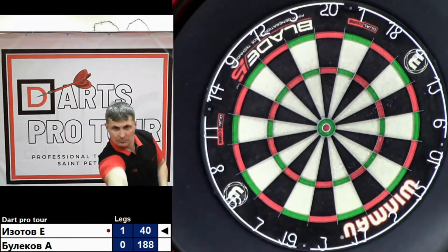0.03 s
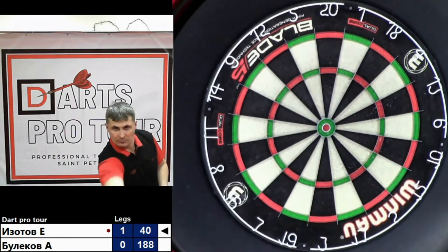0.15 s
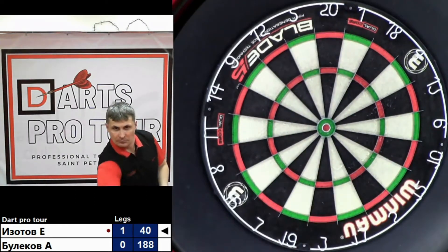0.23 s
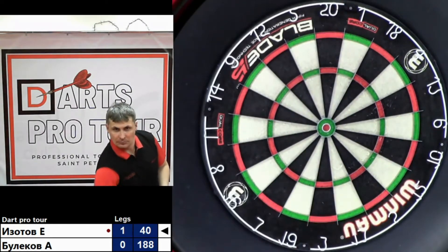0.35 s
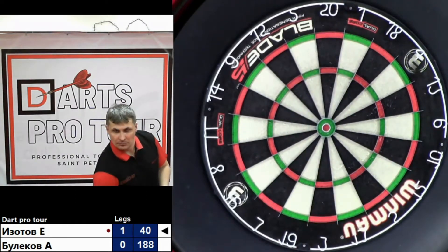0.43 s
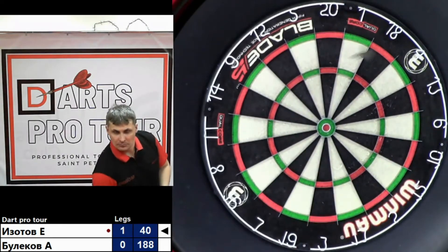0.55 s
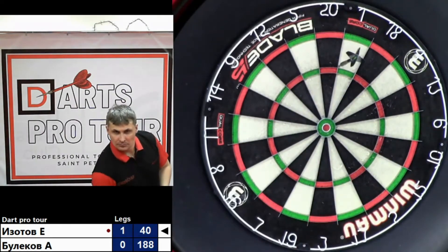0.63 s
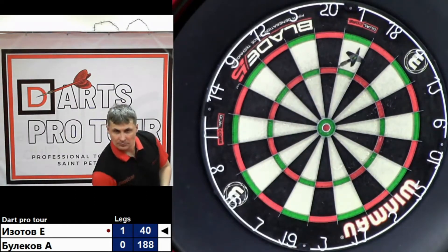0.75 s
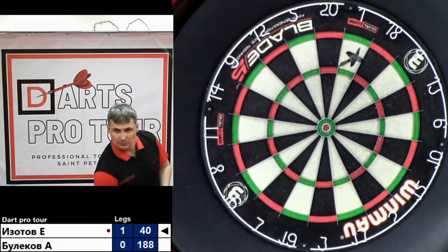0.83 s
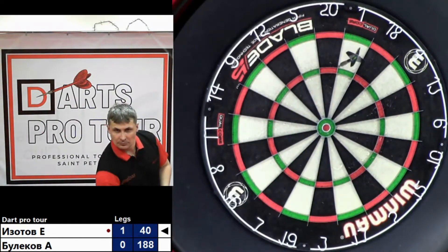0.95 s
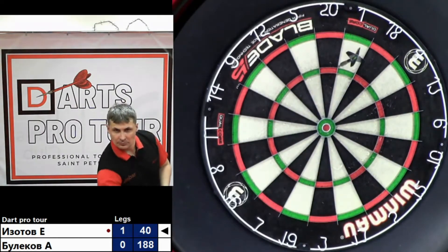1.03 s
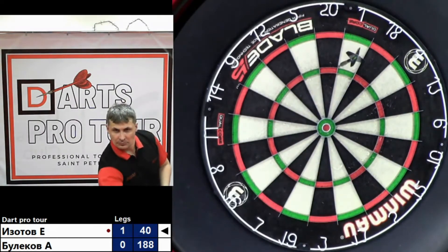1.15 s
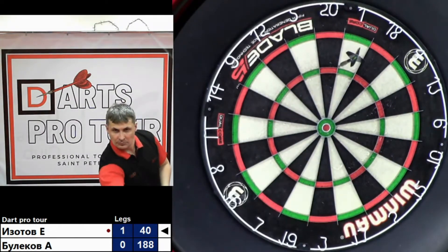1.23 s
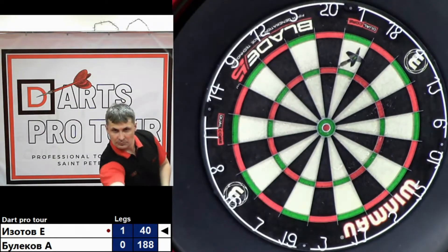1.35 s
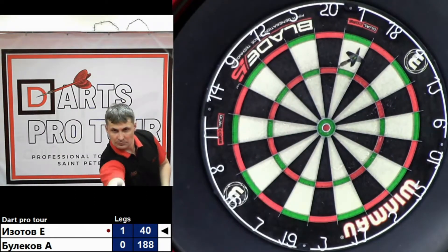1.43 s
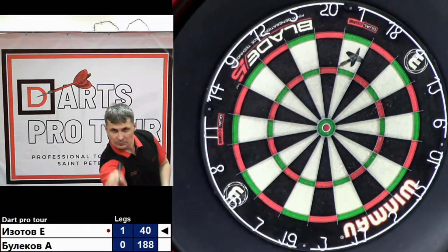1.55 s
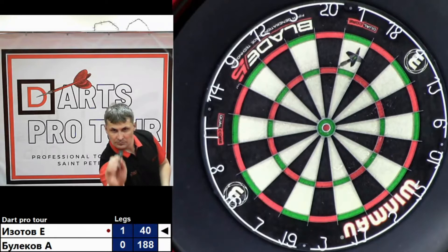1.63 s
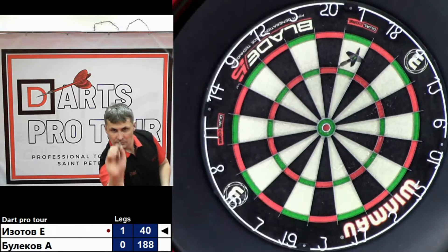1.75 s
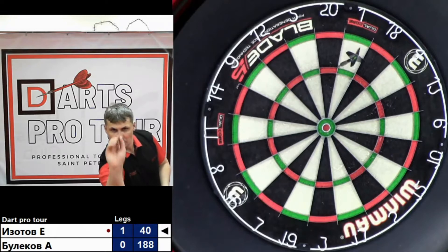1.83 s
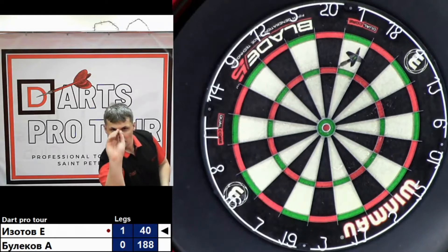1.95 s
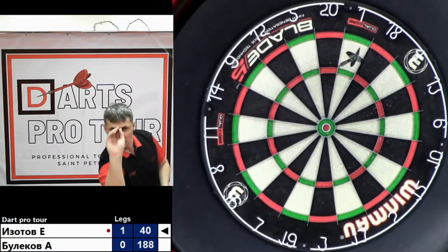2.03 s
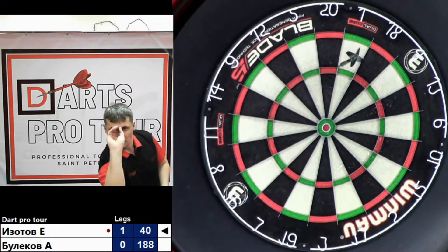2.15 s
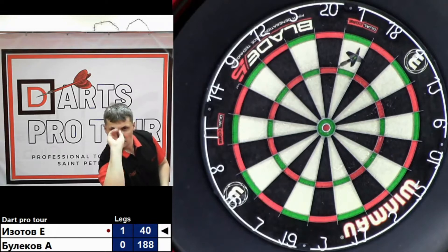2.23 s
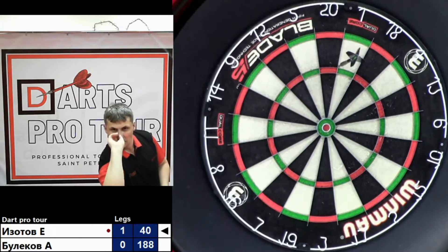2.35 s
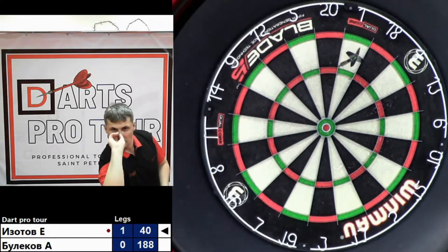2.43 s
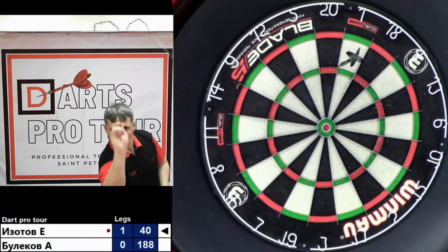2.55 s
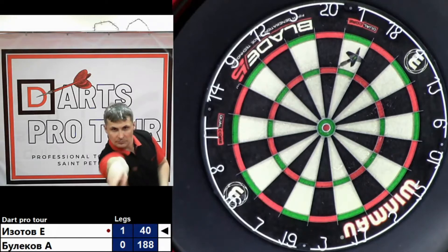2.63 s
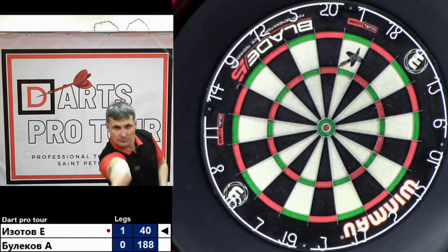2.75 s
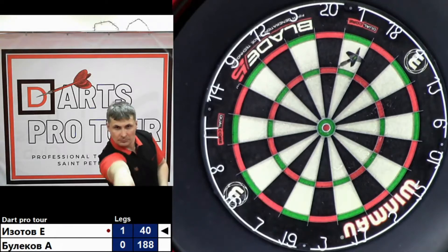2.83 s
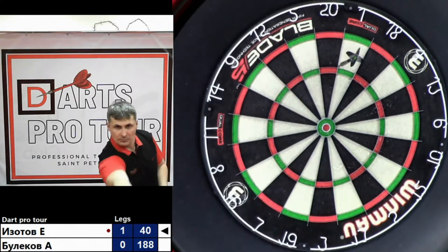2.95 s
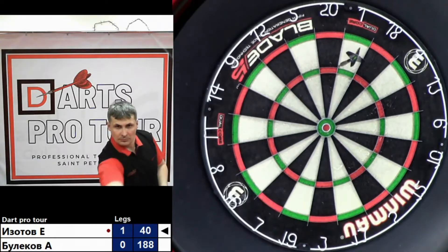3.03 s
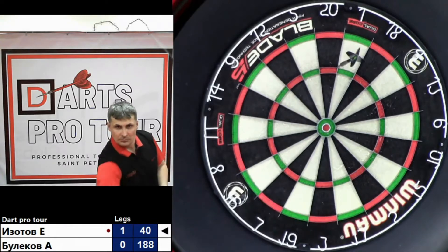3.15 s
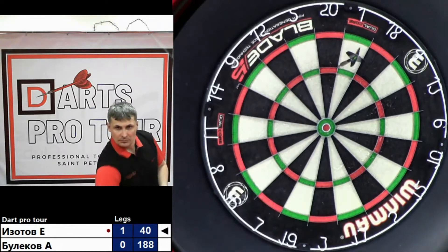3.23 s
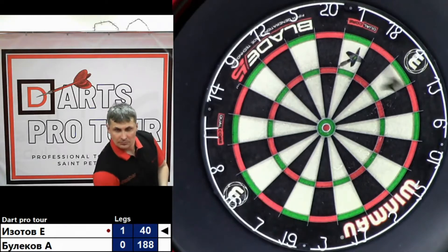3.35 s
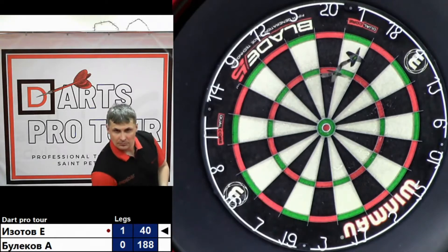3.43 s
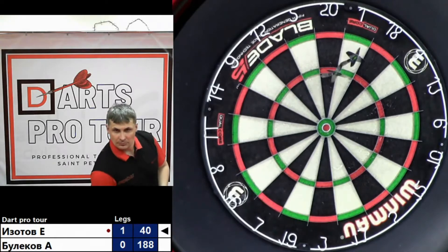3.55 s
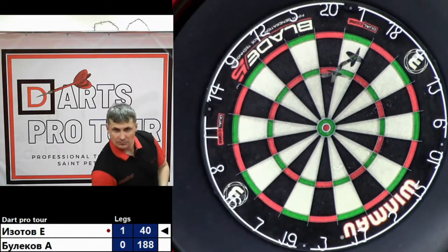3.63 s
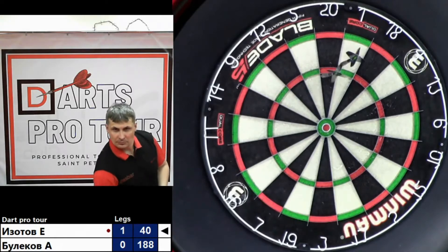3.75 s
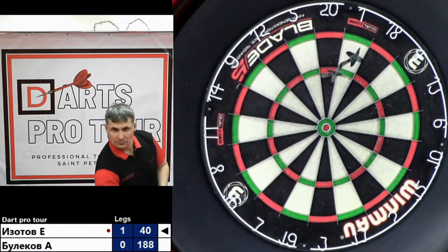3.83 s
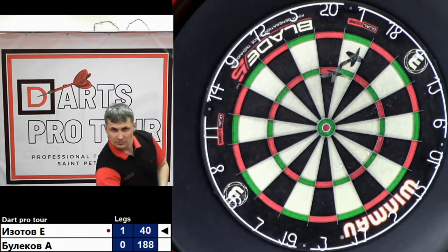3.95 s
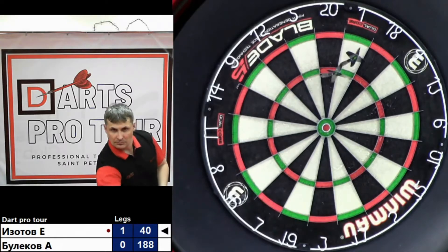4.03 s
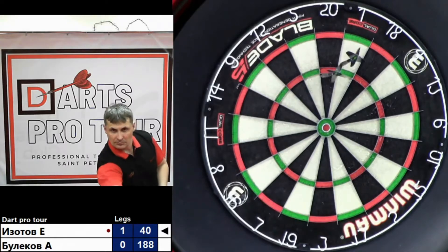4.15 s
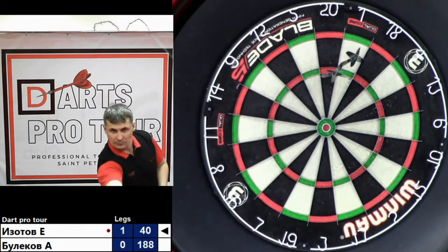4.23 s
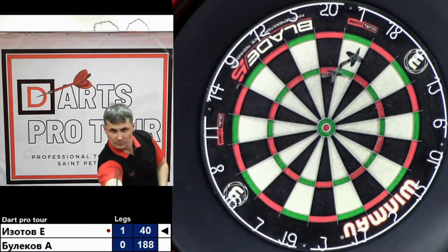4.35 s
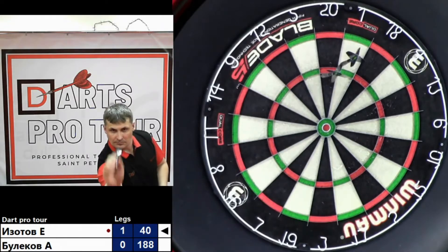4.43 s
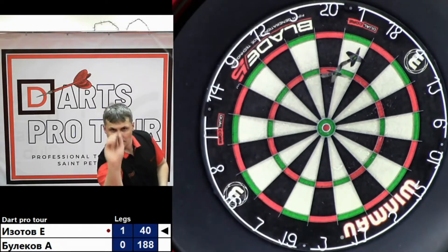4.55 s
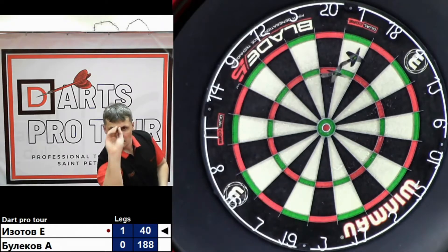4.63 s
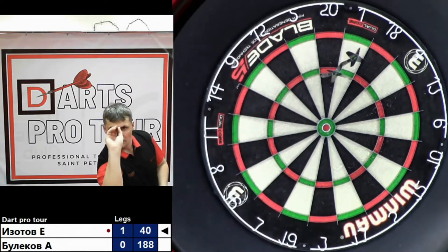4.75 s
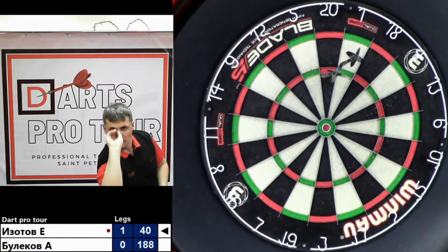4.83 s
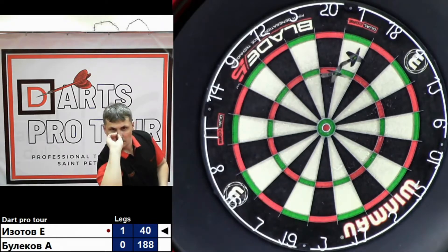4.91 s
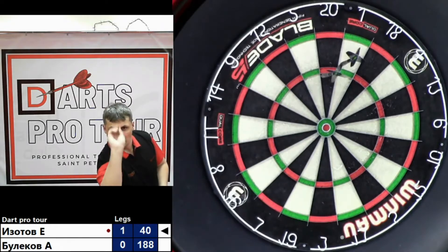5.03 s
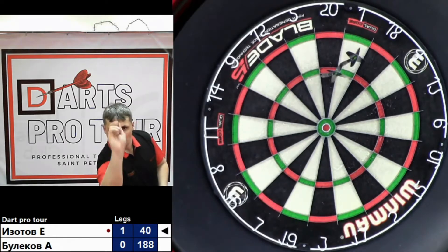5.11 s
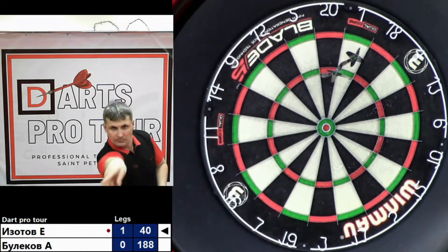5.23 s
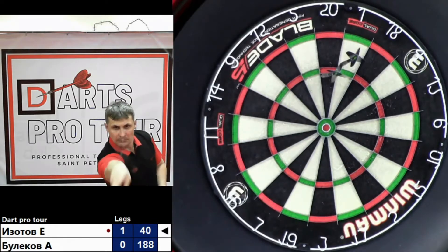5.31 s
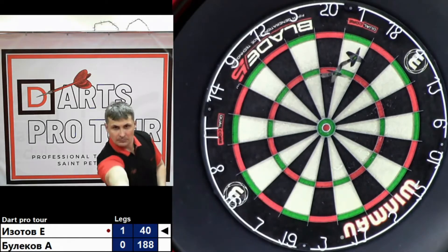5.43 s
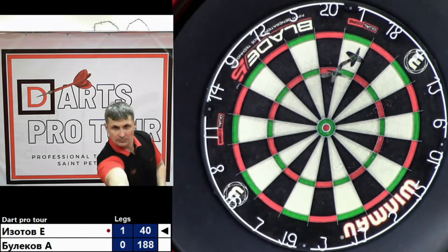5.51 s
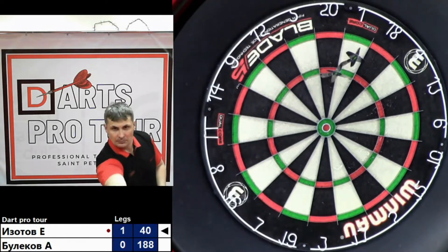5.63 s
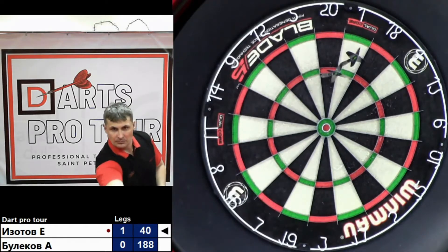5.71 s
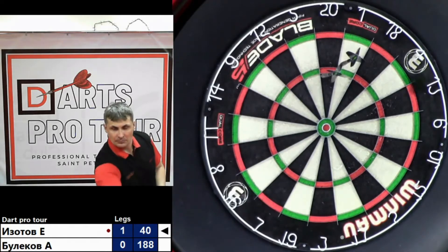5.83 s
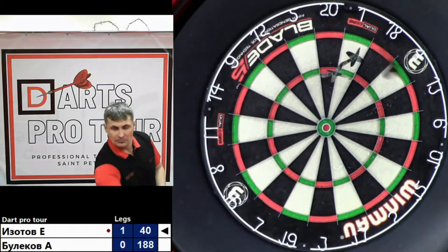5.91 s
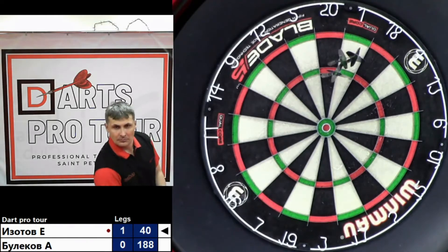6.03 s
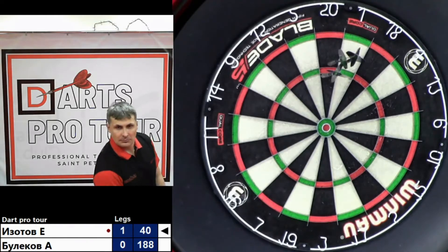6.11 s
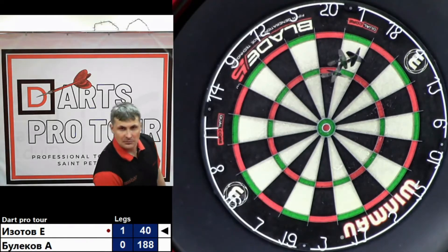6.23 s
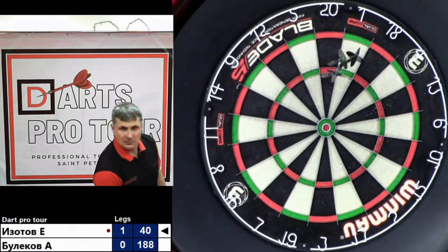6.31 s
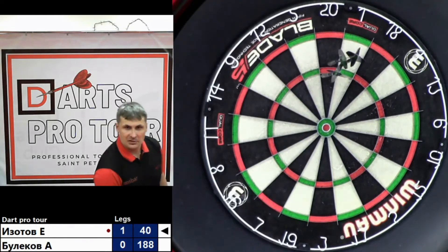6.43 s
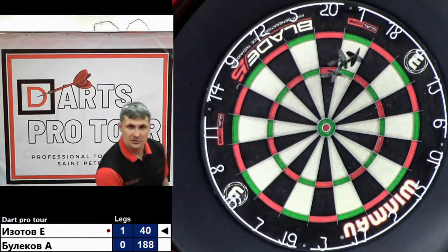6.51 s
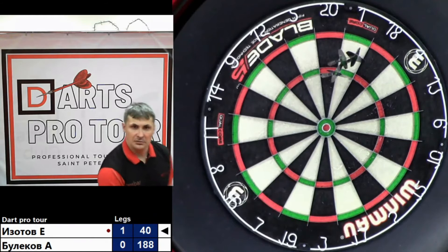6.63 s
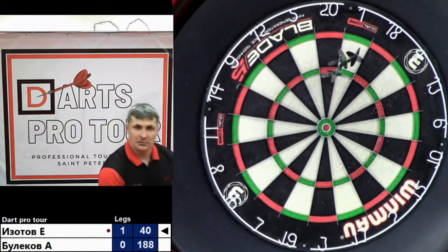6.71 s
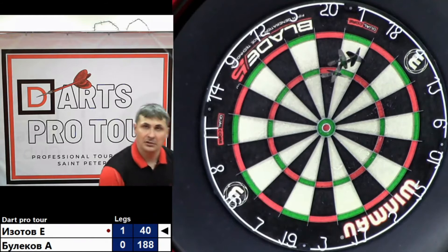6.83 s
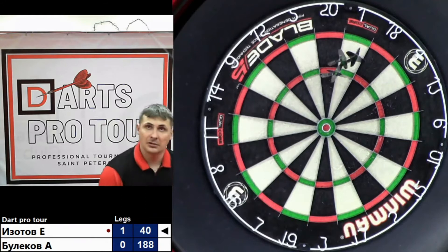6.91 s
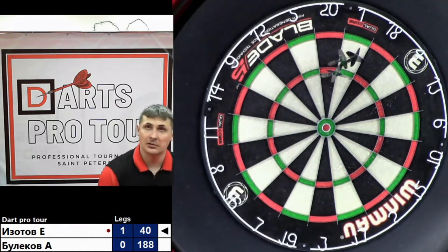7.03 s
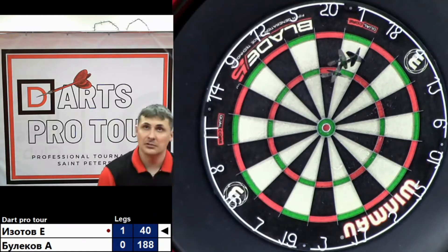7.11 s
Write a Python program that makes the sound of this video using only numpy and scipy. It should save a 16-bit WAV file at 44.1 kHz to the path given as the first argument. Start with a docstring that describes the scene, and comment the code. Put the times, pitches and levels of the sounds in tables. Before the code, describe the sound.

Close, slightly overloaded dart blows strike a wall-mounted bristle board three times in a small room, the last softer with a light rattle and clink.

```python
"""Three darts thud into a bristle board on a wall, right beside a microphone that overloads on the blows.
Each blow sets fading tones and noise ringing in board, wall and small room; the point's crunch is
a burst of noise, the dart's rattle is rough noise, and the barrel's clink is a few short tones.
Soft knocks surround the last dart, and a dull echo returns from the far wall.
Behind them a fan rumbles (filtered noise) and whines (wandering tones) over electronic hiss."""
import sys
import numpy as np
from scipy import signal
from scipy.fft import rfft, irfft
from scipy.io import wavfile
from scipy.ndimage import uniform_filter1d

SR = 44100
rng = np.random.default_rng(int(sys.argv[2]) if len(sys.argv) > 2 else 0)


def generate_wav(sig):
    """Save sig (samples, or channels by samples) to the path in sys.argv[1] as 16-bit PCM at SR."""
    pcm = np.round(np.clip(np.atleast_2d(sig).T, -1, 1) * 32767).astype(np.int16)
    wavfile.write(sys.argv[1], SR, pcm)


N = 316461  # length of the scene [samples]

ENTRY_S, ENTRY_DB = 0.0032, -17  # the point goes in this long before the blow, and this much softer
FLIGHT_S = 0.001  # sound travel from the board to the microphone

# The three throws: (time [s], whole dart level [dB], push length [s], board face boost [dB],
# crunch level [dB], rattle level [dB], barrel clink level [dB])
THROWS = [(0.782, -6.5, 0.00043, 1.5, -11.5, -33, -36.5), (3.649, -5, 0.00048, -2.5, -26.5, -35.5, -45),
          (6.2018, -9.5, 0.00051, 0, -24.5, -26, -27.5)]


def darts():
    """Each throw lands at its own time, with its own strength and touch."""
    out = np.zeros(N)
    for time_s, db, *touch in THROWS:
        hit = undb(db) * dart(*touch)
        start = int((time_s + FLIGHT_S - ENTRY_S) * SR)
        out[start:start + len(hit)] += hit[:N - start]
    return out


def dart(push_s, face_db, crunch_db, rattle_db, clink_db):
    """The heavy barrel drives the blow; a faint early copy of it stands for the point going in."""
    t = np.arange(int(SR / 2)) / SR
    blow = board_blow(t, push_s, face_db) + crunch(t, crunch_db)
    blow = blow + dart_rattle(t, rattle_db) + barrel_clink(t, clink_db)
    lag = int(ENTRY_S * SR)
    main = np.pad(blow, (lag, 0))
    entry = undb(ENTRY_DB) * np.pad(blow, (0, lag))
    return main + entry


WALL_HZ, FACE_HZ = 185, 560  # wall tones lie below the first, board face tones above the second
WALL_LAG_S = 0.0046  # the blow needs a moment to reach the wall
WASH_RISE_S = 0.00086  # time constant of the noise building up
LONGEST_T60_S = 0.16  # the bristles make every tone lose 60 dB at least this fast

# Tones of board and wall: (frequency [Hz], level before face boost [dB], 60 dB decay before the limit [s])
BOARD_MODES = [(89.4, 2, 0.097), (129.5, 0.5, 0.12), (159.6, 0.5, 0.092), (211.6, -4, 0.17),
               (252.8, -3.5, 0.13), (284.7, -9, 0.18), (400.6, 1.6, 0.12), (455, -10.5, 0.17),
               (534, -20.5, 0.16), (605, -3, 0.096), (639.6, -7, 0.12), (710.4, -7.5, 0.12),
               (750, -12.5, 0.1), (813, -12, 0.18), (1024, -14, 0.21), (1085, -17, .13),
               (1225.4, -11, 0.14), (1418, -20, 0.14), (1644, -19.5, .13)]
# Dense ringing of board, wall and room: (centre frequency [Hz], level [dB], 60 dB decay time [s])
WASH_BANDS = [(60, -22.5, 0.18), (110, -10.5, 0.16), (198, -8, 0.18), (347, -7.5, 0.11), (712, -10, 0.16),
              (1228, -10.5, 0.16), (2270, -26, 0.2), (3520, -22, 0.2)]


def board_blow(t, push_s, face_db):
    """Board and wall ring in tones and dense noise; a longer push gives a duller blow."""
    modes = [(hz, db + face_db * (hz > FACE_HZ), min(t60, LONGEST_T60_S)) for hz, db, t60 in BOARD_MODES]
    wall = ring(np.maximum(t - WALL_LAG_S, 0), [mode for mode in modes if mode[0] < WALL_HZ])
    board = ring(t, [mode for mode in modes if mode[0] >= WALL_HZ])
    rise = 1 - np.exp(-t / WASH_RISE_S)
    body = wall + board + rise * wash(t, WASH_BANDS, spread=0.89)
    push = signal.windows.hann(max(int(push_s * SR), 3))
    return np.convolve(body, push / push.sum())[:len(t)]


CRUNCH_S, CRUNCH_HZ = 0.0031, 2300  # fading time constant; centre and width of its noise band
REBOUND_S, REBOUND_DB = 0.006, 2  # the barrel knocks again this much later; its clink is then louder


def crunch(t, db):
    """The point crushes the bristles: a quickly fading noise burst, repeated when the barrel rebounds."""
    first = np.exp(-t / CRUNCH_S)
    second = (t > REBOUND_S) * np.exp(-np.abs(t - REBOUND_S) / CRUNCH_S)
    noise = noise_band(rng.standard_normal(len(t)), CRUNCH_HZ, CRUNCH_HZ, db)
    return (first + second) * noise


RATTLE_S, SETTLE_S = 0.067, 0.008  # the dart shakes this long, then settles over this time constant

# Shaking of shaft and flight: (centre frequency [Hz], level within the rattle [dB], 60 dB decay time [s])
RATTLE_BANDS = [(3440, -3.5, 0.28), (5000, -5, 0.24), (6400, -7, .2)]


def dart_rattle(t, db):
    """Shaft and flight shake: noise bands with a quickly varying, grainy loudness."""
    chance = uniform_filter1d(rng.standard_normal(len(t)), size=49) * np.sqrt(49)
    grit = undb(1.6 * chance)  # loudness varies with a spread of 1.6 dB
    settle = 1 / (1 + np.exp((t - RATTLE_S) / SETTLE_S))
    return undb(db) * grit * wash(t, RATTLE_BANDS, spread=0.2) * settle


# Tones of the barrel: (frequency [Hz], level within the clink [dB], 60 dB decay time [s])
BARREL_MODES = [(2300, -6, 0.035), (3540, 1, .03), (5274, 4, 0.028), (6390, -14, .02)]


def barrel_clink(t, db):
    """The barrel rings in short tones, struck again at the rebound."""
    first = ring(t, BARREL_MODES)
    second = undb(REBOUND_DB) * ring(np.maximum(t - REBOUND_S, 0), BARREL_MODES)
    return undb(db) * (first + second)


BUILD_CYCLES = 0.41  # a tone needs part of a cycle to take up the blow


def ring(t, modes):
    """Fading tones that swell over part of a cycle; neighbours swing in opposite directions."""
    hz, db, t60 = np.transpose(modes)[:, :, None]
    sign = (-1.0) ** np.arange(len(modes))[:, None]
    swell = 1 - np.exp(-hz * t / BUILD_CYCLES)
    fade = undb(db - 60 * t / t60)
    return np.sum(sign * swell * fade * np.sin(2 * np.pi * hz * t), axis=0)


def wash(t, bands, spread):
    """Bands of noise, each fading at its own rate; spread is their width as a share of the pitch."""
    out = np.zeros(len(t))
    for hz, db, t60 in bands:
        noise = noise_band(rng.standard_normal(len(t)), hz, spread * hz, db)
        out += undb(-60 * t / t60) * noise
    return out


TAP_S, TAP_WIDTH = 0.011, 0.25  # time from peak down to 37 %; width as a share of the pitch

# Faint knocks around the last dart: (time [s], level [dB], centre frequency [Hz])
TAP_EVENTS = [(6.149, -54, 620), (6.352, -52, 420), (6.345, -55, 760)]


def taps():
    """Short soft knocks: a puff of noise in one resonance."""
    t = np.arange(N) / SR
    out = np.zeros(N)
    for time_s, db, hz in TAP_EVENTS:
        puff = np.exp(-((t - time_s) / TAP_S) ** 2)
        out += undb(db) * puff * noise_band(rng.standard_normal(N), hz, TAP_WIDTH * hz, 0)
    return out


ECHO_S, ECHO_DB, ECHO_HZ = 0.059, -23, 900  # delay, level and low-pass of the echo


def far_wall(x):
    """The far wall returns a late, dull copy."""
    late = np.roll(x, int(ECHO_S * SR))
    return undb(ECHO_DB) * low_pass(late, 2, ECHO_HZ)


CAPSULE_HZ = 7500  # the capsule's treble falls off steeply above this
CEILING, KNEE = 0.4, 65  # largest amplitude; a higher knee makes a sharper corner
MIC_HZ, MIC_TOP_DB = 5950, -2  # above this pitch the input stage approaches this level


def board_microphone(x):
    """The capsule ends steeply; the input stage flattens loud blows at a ceiling and dulls the result."""
    x = signal.sosfilt(signal.cheby1(6, 1, CAPSULE_HZ, fs=SR, output="sos"), x)
    flat = x / (1 + np.abs(x / CEILING) ** KNEE) ** (1 / KNEE)
    low = low_pass(flat, 1, MIC_HZ)
    return low + undb(MIC_TOP_DB) * (flat - low)


AIR_DB = -56.5  # level of the air noise before its rumble surges
RUMBLE_HZ, SURGE_DB = 130.5, 2.0  # top of the rumble; spread of its surges

# Colour of the fan's air noise: (frequency [Hz], relative level [dB])
AIR_COLOUR = [(12, -28.5), (20, 9.5), (33, -8.5), (108, -9.5), (155, -13.5), (270, -12), (540, -15.5),
              (841, -9.5), (914, -15.5), (1310, -20.5), (1640, -20), (1990, -13), (2690, -17),
              (3270, -22.5), (15000, -26)]
# Thin tones of the fan: (frequency [Hz], spread of pitch wander [Hz], level [dB])
WHINE_TONES = [(576, 3, -77.5), (858.6, 4.3, -68), (1920, 20, -74), (2640, 8, -75), (10390, 1.5, -82.5),
               (14490, 3, -87.5)]


def fan():
    """Air noise whose rumble surges, with a few thin tones that wander in pitch."""
    air = level(coloured(AIR_COLOUR), AIR_DB)
    # filtered forwards and backwards, so the rumble stays in step with the air noise
    rumble = signal.sosfiltfilt(signal.butter(2, RUMBLE_HZ, fs=SR, output="sos"), air)
    surge = undb(SURGE_DB * slow(size=6000))
    out = air + (surge - 1) * rumble
    for hz, wander_hz, db in WHINE_TONES:
        pitch = hz + wander_hz * slow(size=3000)
        out = out + level(np.sin(2 * np.pi * np.cumsum(pitch) / SR), db)
    return out


HISS_DB = -67

# Colour of the electronic hiss: (frequency [Hz], relative level [dB])
HISS_COLOUR = [(12, -35.5), (20, 1.5), (194, -11.5), (1640, -19.5), (1990, -27), (4820, -18), (7300, -22),
               (8160, -39), (15000, -33)]


def hiss():
    """The electronics make a steady, coloured noise."""
    return level(coloured(HISS_COLOUR), HISS_DB)


def undb(db):
    """Turn decibels into an amplitude factor."""
    return 10 ** (np.asarray(db) / 20)


def level(x, db):
    """Scale a sound to an average (rms) level."""
    return x * undb(db) / np.sqrt(np.mean(x ** 2))


def low_pass(x, order, hz):
    """Keep what lies below a pitch."""
    return signal.sosfilt(signal.butter(order, hz, fs=SR, output="sos"), x)


def noise_band(noise, hz, width_hz, db):
    """Pass noise through the same resonance twice, then set its level."""
    b, a = signal.iirpeak(hz, hz / width_hz, SR)
    once = signal.lfilter(b, a, noise)
    return level(signal.lfilter(b, a, once), db)


def coloured(colour):
    """Noise whose spectrum runs through the listed points, joined on a log pitch scale."""
    hz, db = np.transpose(colour)
    bins = np.maximum(np.fft.rfftfreq(N, 1 / SR), 1)
    gain = undb(np.interp(np.log(bins), np.log(hz), db))
    return irfft(rfft(rng.standard_normal(N)) * gain, N)


def slow(size):
    """Smooth random drift with spread 1; size is the smoothing length in samples."""
    once = uniform_filter1d(rng.standard_normal(N), size=size)
    return level(uniform_filter1d(once, size=size), 0)


TREBLE_HZ, TREBLE_LEFT = 6000, 0.05  # treble above this leans left by this share


def scene():
    """Darts and fan in the middle; the hiss is opposite in the two channels, the treble leans left."""
    hits = darts()
    mid = board_microphone(hits + far_wall(hits) + taps()) + fan()
    treble = signal.sosfilt(signal.butter(2, TREBLE_HZ, "high", fs=SR, output="sos"), mid)
    side = hiss() + TREBLE_LEFT * treble
    return np.array([mid + side, mid - side])


TOP_HZ = 15000


def record(dry):
    """The recorder cuts the top steeply."""
    return signal.sosfilt(signal.ellip(14, 0.3, 80, TOP_HZ, fs=SR, output="sos"), dry)


dry = scene()
out = record(dry)
generate_wav(out)
```